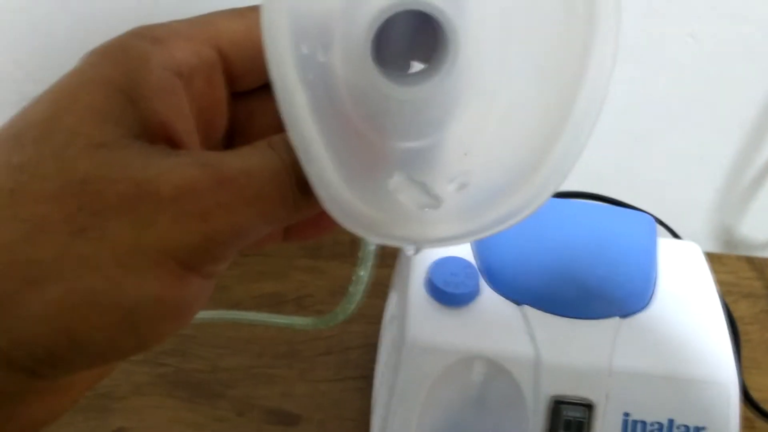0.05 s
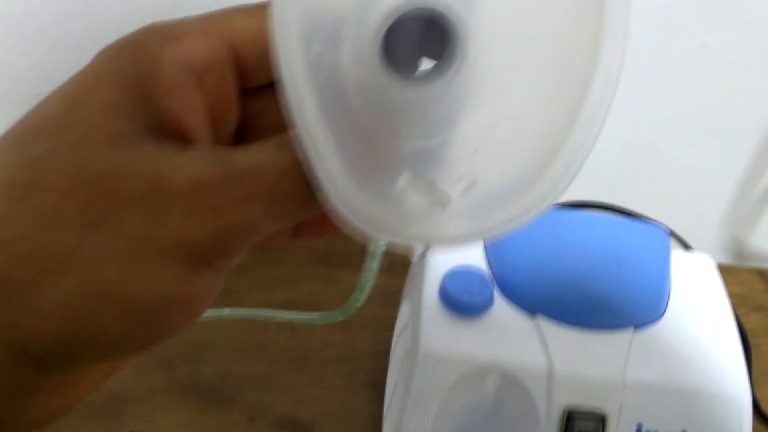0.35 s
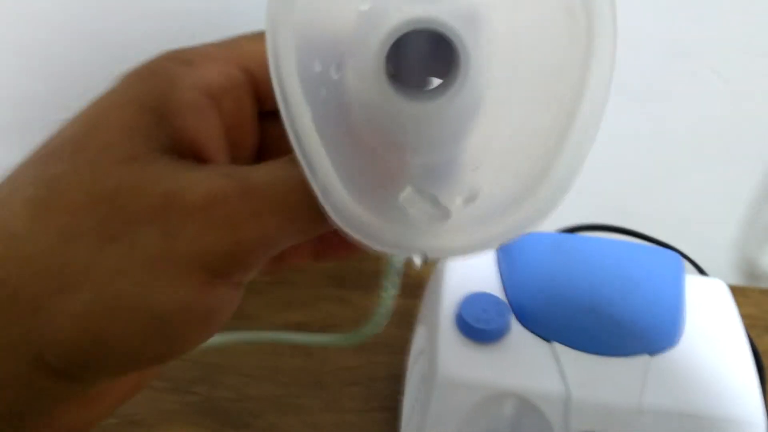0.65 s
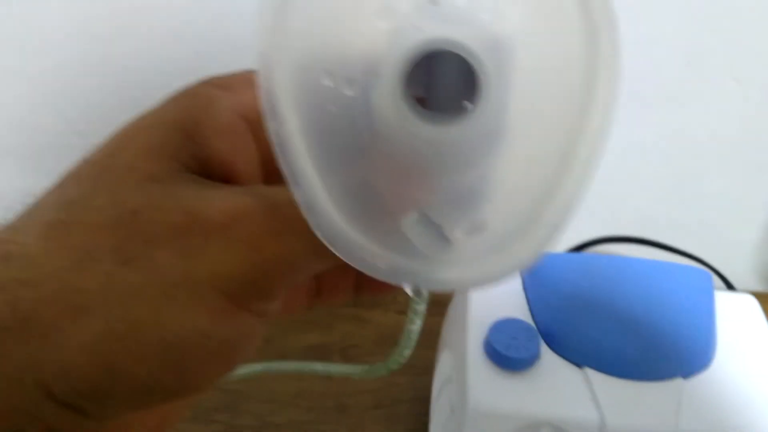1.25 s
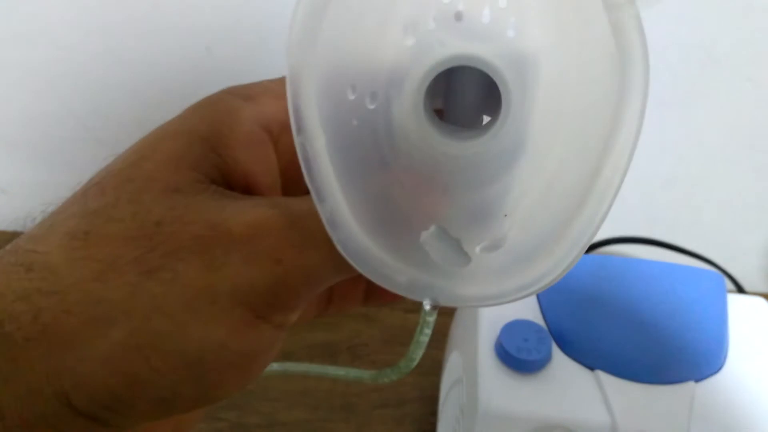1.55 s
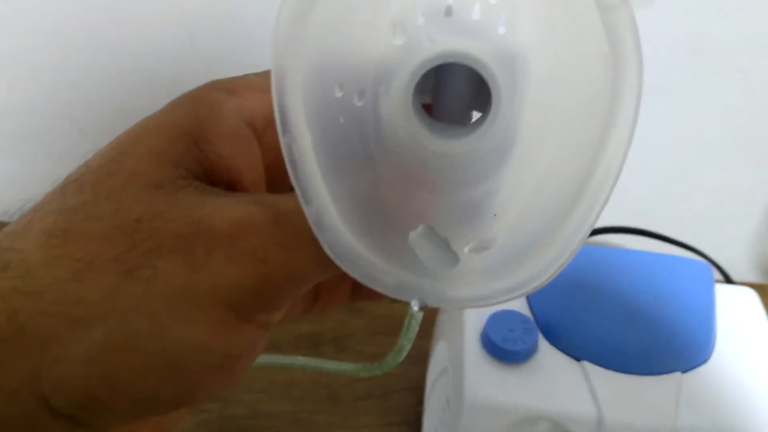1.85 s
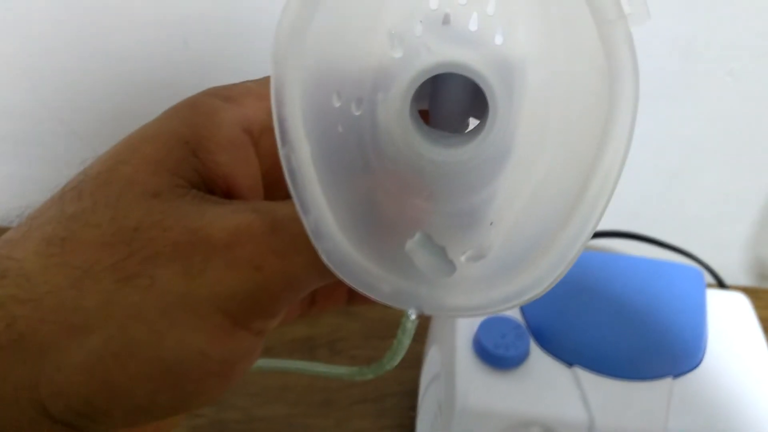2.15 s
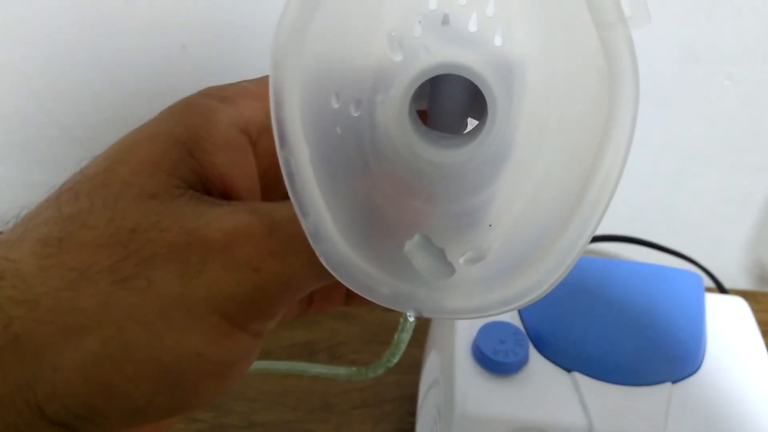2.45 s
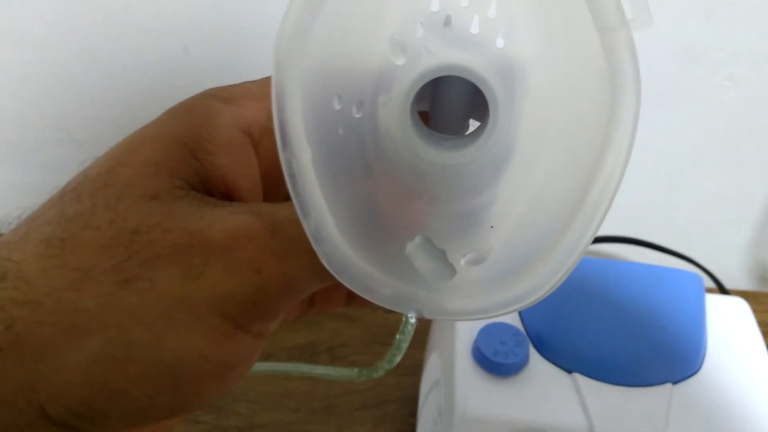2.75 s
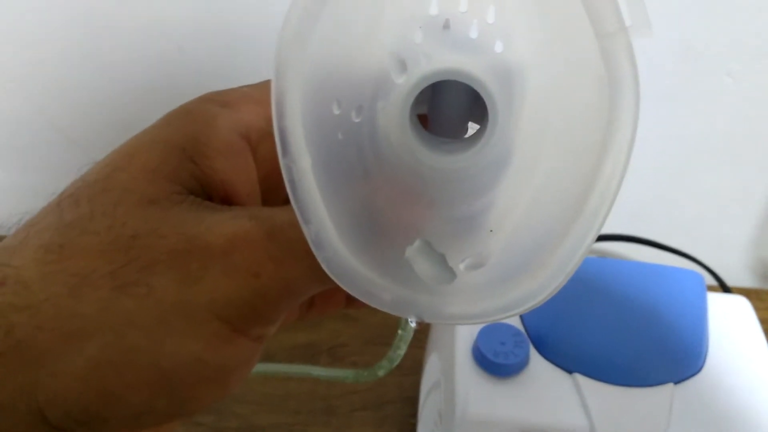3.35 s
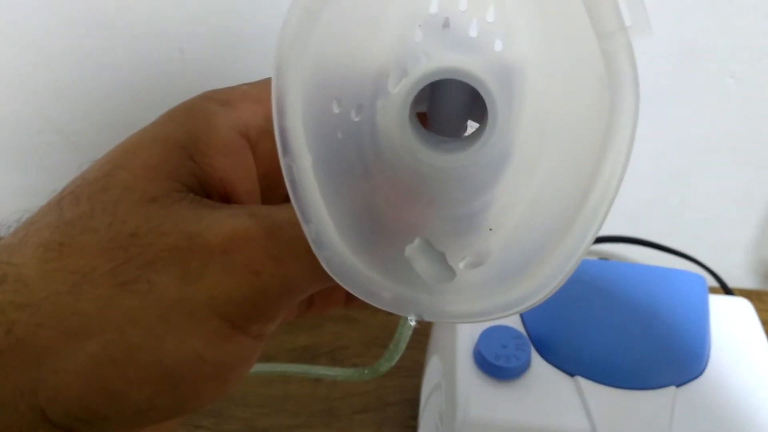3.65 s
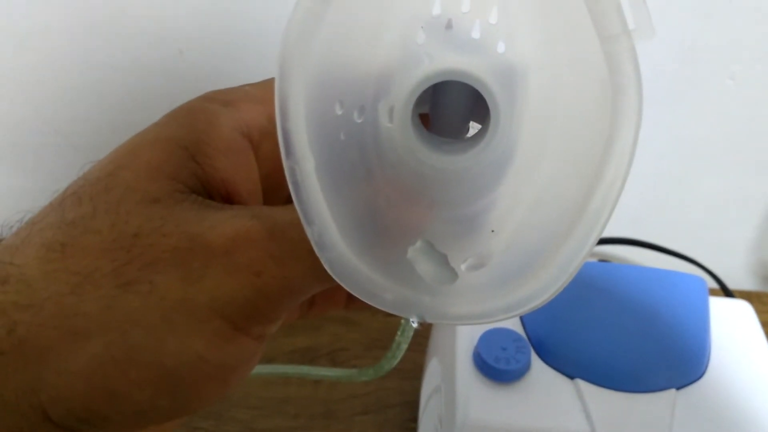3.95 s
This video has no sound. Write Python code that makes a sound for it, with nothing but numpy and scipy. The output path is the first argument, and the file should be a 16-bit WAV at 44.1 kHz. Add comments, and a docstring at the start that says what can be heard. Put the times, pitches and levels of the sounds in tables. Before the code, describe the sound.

A nebulizer runs for the whole four seconds, its compressor buzzing with a thin high squeak and low hum while air hisses through the mask, very close. Liquid spits in small hollow pops near the start, around 1.1 and 1.4 seconds, often from 2.1 to 3.1, and near 3.7. Tiny whistles come and go, and a hand softly bumps the mask at about 0.5 seconds.

```python
"""At a table where a nebulizer runs, its plastic mask held close to a two-port stereo microphone.
Up front the air jet hisses through the mask; now and then the liquid spits and sets the mask's hollow
ringing, or the nozzle whistles. With it the piston compressor drones, its valves buzz and squeak on
every turn and the motor hums with the mains. Droplets tick and a hand bumps the mask over a low rumble."""
import sys
import numpy as np
from scipy import signal
from scipy.fft import rfft, irfft
from scipy.io import wavfile

SR = 44100
rng = np.random.default_rng(int(sys.argv[2]) if len(sys.argv) > 2 else 0)


def dump(signal):
    """Clip the signal to [-1, 1] and save it as 16-bit WAV at the path in sys.argv[1]."""
    limited = np.clip(np.atleast_2d(signal).T, -1, 1)
    pcm = np.round(limited * 32767).astype(np.int16)
    wavfile.write(sys.argv[1], SR, pcm)


N = 176400
T = np.arange(N) / SR
FREQS = np.maximum(np.fft.rfftfreq(N, 1 / SR), 1)
TURNS_PER_S = 51.3427
TURN = TURNS_PER_S * T - .125   # position of the compressor's shaft [turns]
SIDES = np.array([[1], [-1]])   # left port, right port

# Strength of the spray, played about its mean: (time [s], level [dB])
SPRAY_STRENGTH = [(0.0, -40.5), (0.05, -43), (0.08, -42), (0.11, -45.5), (0.29, -42), (1.08, -42),
                  (1.38, -45), (1.43, -41), (1.45, -41.5), (2.39, -43.5), (2.47, -49.5), (2.48, -43.5),
                  (2.99, -41.5), (3.53, -44), (3.77, -41), (3.87, -42), (3.89, -40), (4.0, -45)]
# The jet's hiss, close up: (frequency [Hz], relative density [dB])
JET_SPECTRUM = [(500, -80.5), (800, -76), (1050, -82), (1300, -73.5), (1700, -78.5), (2200, -85.5),
                (3200, -79.5), (4400, -78), (5400, -81), (6000, -86), (6400, -90), (7000, -82), (7900, -89),
                (8250, -99), (8600, -104), (9200, -109), (10100, -115), (10550, -118), (11100, -86),
                (11800, -89), (12300, -87.5), (13000, -84.5), (13500, -101), (14200, -102)]
# Bright edge of the hiss: (frequency [Hz], relative density [dB])
EDGE_SPECTRUM = [(8500, -110), (8900, -85), (9250, -80.5), (9700, -86), (10050, -89.5), (10500, -120)]
# That edge as the mask shifts at the microphone: (time [s], gain [dB])
EDGE_GAIN = [(0, -2), (.64, -5.5), (.70, 0.5), (1.1, 2), (1.3, 0.3), (4, -0.7)]
# The mask's hollow: (frequency [Hz], half-width [Hz], relative level [dB], flicker [dB], stroke swell [dB])
MASK_RESONANCES = [(734, 51, -45.5, 2, 4), (2620, 260, -48, -1.5, -1), (3941, 100, -43, 2.5, 0),
                   (4560, 56, -54, 0, -0.5), (5913, 220, -48, 1.5, .3), (8005, 120, -61.5, 2.5, 0)]
def jet():
    """Grainy, sputtering hiss that pulses with each piston stroke and rings in the mask."""
    sputter_hz, grain_hz = 43, 190
    stroke = np.cos(2 * np.pi * (TURN - .25))
    flow = from_db(spray_swing_db() + 1.12 * drift(sputter_hz) - .26 * stroke)
    hiss = shaped_noise(JET_SPECTRUM) + from_db(in_time(EDGE_GAIN)) * shaped_noise(EDGE_SPECTRUM)
    hollow = 0
    for hz, width_hz, db, flicker_db, swell_db in MASK_RESONANCES:
        band = band_noise(hz, width_hz)
        hollow += band * from_db(db + flicker_db * drift(sputter_hz) + swell_db * stroke)
    grain = from_db(1.18 * drift(grain_hz))
    return flow * (hiss * grain + hollow)


# Liquid spitting right at the microphone: (time [s], relative level [dB], pitch [Hz], 60 dB decay [s])
LIQUID_SPITS = [(0.072, -17.5, 724, 0.062), (0.271, -31, 714, 0.07), (0.47, -22.5, 730, 0.11),
                (1.071, -16.5, 735, 0.07), (1.114, -20, 750, 0.061), (1.21, -27, 746, 0.089),
                (1.419, -15.5, 746, 0.044), (1.745, -28.5, 743, 0.077), (2.108, -21.5, 758, 0.098),
                (2.281, -15.5, 728, 0.07), (2.346, -18, 736, 0.1), (2.489, -26, 754, 0.11),
                (2.553, -16, 736, 0.078), (2.662, -21, 741, 0.11), (2.706, -15.5, 735, 0.087),
                (2.955, -17.5, 727, 0.07), (3.004, -22.5, 750, 0.11), (3.064, -14.5, 720, 0.05),
                (3.113, -18.5, 763, 0.05), (3.69, -16.5, 727, 0.079), (3.738, -17.5, 729, 0.072),
                (3.897, -22.5, 747, 0.078)]
# Spray thrown by a spit: (frequency [Hz], relative density [dB])
SPLASH_SPECTRUM = [(300, -50), (600, -25), (880, -20), (1100, -44), (1600, -54), (2500, -50), (5000, -36),
                   (9000, -70), (14000, -77)]
def spits():
    """Each spit pops the air in the mask, sagging onto its pitch, and throws a puff of spray."""
    lead_s, attack_s, splash_s = .0012, .0013, .0044
    bend, bend_s = .096, .0028   # starts sharp by this share, then settles
    pops, puffs = np.zeros(N), np.zeros(N)
    for at, db, hz, t60 in LIQUID_SPITS:
        start = at - lead_s
        t = T[T >= start] - start
        swell = from_db(db) * (1 - np.exp(-t / attack_s))
        cycles = hz * (t + bend * bend_s * (1 - np.exp(-t / bend_s)))
        pops[-len(t):] += swell * from_db(-60 * t / t60) * np.sin(2 * np.pi * cycles)
        puffs[-len(t):] += swell * np.exp(-t / splash_s)
    return from_db(-1.5) * pops + from_db(-13.5) * puffs * shaped_noise(SPLASH_SPECTRUM)


# Short whistles of the nozzle, close up: (time [s], level [dB])
NOZZLE_WHISTLES = [(.08, -30), (.275, -32.5), (.40, -34.5), (.475, -38), (.57, -35), (.955, -31),
                   (1.0, -35), (1.129, -31.5), (1.426, -28.5), (1.62, -56), (2.285, -38), (2.405, -39),
                   (2.74, -37), (2.965, -36), (3.035, -30.5), (3.657, -31.5), (3.745, -31.5), (3.90, -36)]
def whistles():
    """The nozzle briefly sings on an unsteady pitch."""
    level = sum(from_db(db) * bell(T - at, width_s=.0082) for at, db in NOZZLE_WHISTLES)
    return level * band_noise(hz=3936, width_hz=103)


# Drone and housing buzz of the compressor on the table: (multiple of the shaft rate, relative level [dB])
SHAFT_HARMONICS = [(1, -13), (2, -2.5), (3, -6), (4, 1), (5, -10.5), (6, -9.5), (7, -12.5), (8, -4.5),
                   (9, -18.5), (10, -9.5), (11, -19), (12, -36), (13, -6.5), (14, 0.5), (15, -3.5),
                   (16, -16), (17, -12.5), (18, -12.5), (19, -28), (20, -28), (21, -29), (22, -20.5),
                   (23, -28), (24, -13), (25, -16.5), (26, -12.5), (27, -23.5), (28, -29), (29, -16.5),
                   (30, -17), (31, -13), (32, -28), (33, -11.5), (34, -48), (35, -19.5), (36, -18)]
# Valve actions in each turn: (shaft position [turns], push + or pull -)
VALVE_STROKES = [(.22, 0.55), (0.391, -0.37), (.74, 0.81), (0.889, -1.08)]
def drone():
    """The valve strokes time the shaft's harmonics; the housing gives them their levels."""
    buzz_from_hz = 640
    position, push = np.transpose(VALVE_STROKES)
    wavers = [drift(6.9) for _ in range(7)]
    pumping = 0
    for k, db in SHAFT_HARMONICS:
        timing = np.angle(np.sum(push * np.exp(-2j * np.pi * k * position)))
        waver_db = .47
        if k * TURNS_PER_S > buzz_from_hz:
            db, waver_db = db - 2, 1.5
            timing -= .005 * k * k   # the housing's ringing smears the buzz in time
        level = from_db(db + waver_db * wavers[k % len(wavers)])
        pumping += level * np.cos(2 * np.pi * k * TURN + timing)
    return pumping * from_db(-39 + .57 * spray_swing_db())   # rises and falls with the spray


# The valves' squeak, close by: (time [s], typical peak level [dB])
VALVE_SQUEAK_LEVEL = [(0, -44), (.6, -47.5), (1.0, -42), (2.5, -43), (4, -43.5)]
def squeak():
    """The valves give one thin falling chirp per turn, each at its own strength."""
    centre_hz, fall_hz_per_s, scatter_db, at_turn = 11540, 350000, 3.5, .385
    t = time_from_shaft(at_turn)
    turn = np.floor(TURN - at_turn + .5).astype(int) + 1
    size, phase = rng.standard_normal((int(TURN[-1]) + 10, 2))[turn].T
    chirp = np.sin(2 * np.pi * (centre_hz * t - fall_hz_per_s * t * t / 2 + phase))
    level = from_db(in_time(VALVE_SQUEAK_LEVEL) + scatter_db * size)
    return level * bell(t, width_s=.00089) * chirp


# Mains hum and its sidebands, one shaft rate apart: (frequency [Hz], relative level [dB])
HUM_TONES = [(68.7, -60), (120.0, -48), (171.3, -49), (222.7, -58)]
def hum():
    """The motor's iron hums with the mains, a little out of step at the two ports."""
    lag_rad = .19 * SIDES
    return sum(from_db(db + 1) * np.sin(2 * np.pi * (hz * T + rng.random()) - lag_rad)
               for hz, db in HUM_TONES)


# Air at the compressor's intake: (frequency [Hz], peak density [dB per Hz])
INTAKE_SPECTRUM = [(1000, -98), (1500, -73), (2200, -75), (2800, -74.5), (3500, -73), (5000, -114)]
def intake():
    """The intake draws a short puff of air once per turn."""
    return bell(time_from_shaft(at_turn=.22), width_s=.0014) * shaped_noise(INTAKE_SPECTRUM)


# Droplets on the mask, next to the microphone: (time [s], relative level [dB])
DROPLET_HITS = [(.481, -62), (1.443, -80), (2.489, -75), (2.731, -69)]
def droplets():
    """Droplets strike the plastic with tiny bright ticks."""
    decay_s, corner_hz = .0008, 14000
    ticks = sum(from_db(db) * (T >= at) * np.exp(-np.abs(T - at) / decay_s) for at, db in DROPLET_HITS)
    return ticks * noise(1 / (1 + (corner_hz / FREQS) ** 4))


# Handling noise on the mask: (time [s], level [dB])
HAND_BUMPS = [(.36, -52), (.51, -42), (3.22, -53)]
def hand_bumps():
    """The hand shifts on the mask with soft, dull bumps."""
    bump_hz = 68.5
    return sum(from_db(db) * bell(T - at, width_s=.02) * np.sin(2 * np.pi * bump_hz * (T - at))
               for at, db in HAND_BUMPS)


# The low bed behind it all: (frequency [Hz], density [dB per Hz])
RUMBLE_SPECTRUM = [(20, -98), (55, -102), (100, -77.5), (200, -76), (400, -75.5), (600, -71.5),
                   (1000, -101), (3000, -110)]
def rumble():
    """Air and motor rumble steadily."""
    return shaped_noise(RUMBLE_SPECTRUM)


# Likeness of the noise at the microphone's two ports: (frequency [Hz], correlation [0-1])
PORT_LIKENESS = [(50, 0.3), (500, 0.73), (1300, 1), (1750, 0.7), (1970, 1), (2280, 1), (2700, 0.88),
                 (3200, 0.23), (3600, 0.73), (4000, 0.77), (4450, 0.63), (5200, 1), (6100, 0.82),
                 (6550, 0.85), (7100, 0.1), (10000, 0.72), (11200, 1), (12300, .4)]
def noise(gain):
    """Noise at both ports with the given amplitude per root Hz."""
    mid, side = rfft(rng.standard_normal((2, N)))
    alike = over_hz(PORT_LIKENESS)
    ports = np.sqrt(1 + alike) * mid + np.sqrt(1 - alike) * side * SIDES
    return irfft(gain * ports, N) * np.sqrt(SR) / 2


def shaped_noise(spectrum):
    """Noise following rows of (frequency [Hz], density [dB per Hz])."""
    return noise(from_db(over_hz(spectrum)))


def band_noise(hz, width_hz):
    """Noise around one resonance, at unit rms."""
    band = noise(1 / (1 + ((FREQS - hz) / width_hz) ** 2))
    return band / band.std()


def drift(rate_hz):
    """Random wander with spread 1, mostly slower than the given rate."""
    slow = irfft(rfft(rng.standard_normal(N)) / (1 + (FREQS / rate_hz) ** 2), N)
    return slow / slow.std()


def spray_swing_db():
    """How far the spray stands above or below its mean."""
    spray_db = in_time(SPRAY_STRENGTH)
    return spray_db - spray_db.mean()


def time_from_shaft(at_turn):
    """Seconds from the shaft's nearest pass through a position."""
    return ((TURN - at_turn + .5) % 1 - .5) / TURNS_PER_S


def bell(t, width_s):
    """A Gaussian swell peaking at t = 0."""
    return np.exp(-(t / width_s) ** 2 / 2)


def from_db(db):
    """Decibels to gain."""
    return 10 ** (np.asarray(db) / 20)


def in_time(rows):
    """A curve of (time [s], value) at every sample."""
    return np.interp(T, *np.transpose(rows))


def over_hz(rows):
    """A curve of (frequency [Hz], value) at every frequency."""
    hz, value = np.transpose(rows)
    return np.interp(np.log(FREQS), np.log(hz), value)


def scene():
    """Compressor and mask, both close to the microphone."""
    compressor = drone() + hum() + intake() + squeak() + rumble()
    return compressor + jet() + spits() + whistles() + droplets() + hand_bumps()


# Left port over right at the microphone: (frequency [Hz], balance [dB])
MIC_BALANCE = [(30, 8), (60, 0), (200, -.7), (700, -1.3), (1300, 0), (2100, -2), (3300, 2.5), (3950, -4),
               (4400, 1), (5900, -0.1), (7000, -2.5), (9300, -6), (11200, -3.5), (13000, -5.5)]
# Lead of the right port: (frequency [Hz], phase [rad])
MIC_PHASE = [(100, 0.7), (1000, -0.06), (1720, 0.94), (1960, 3), (2280, 3.5), (2600, 1.43), (3200, -0.07),
             (3900, -2.5), (4350, -2.5), (4600, -0.6), (5400, 0.59), (6250, 3.0), (6700, 4.5), (7150, 0),
             (8100, 6), (8600, 10), (9200, -0.3), (10000, 2.5), (11000, 1.9), (11500, -0.3), (12250, 3),
             (13300, -0.2)]
def record(dry):
    """Each microphone port hears its own level and phase; the top is cut."""
    cutoff_hz = 14100
    gain = from_db(SIDES * over_hz(MIC_BALANCE) / 2)
    gain /= np.sqrt(np.mean(gain ** 2, axis=0))
    phase_shift = np.exp(-.5j * SIDES * over_hz(MIC_PHASE))
    heard = irfft(rfft(dry) * gain * phase_shift, N)
    lowpass = signal.ellip(10, .1, 80, cutoff_hz, fs=SR, output="sos")
    return signal.sosfilt(lowpass, heard)


dry = scene()
out = record(dry)
dump(out)
```